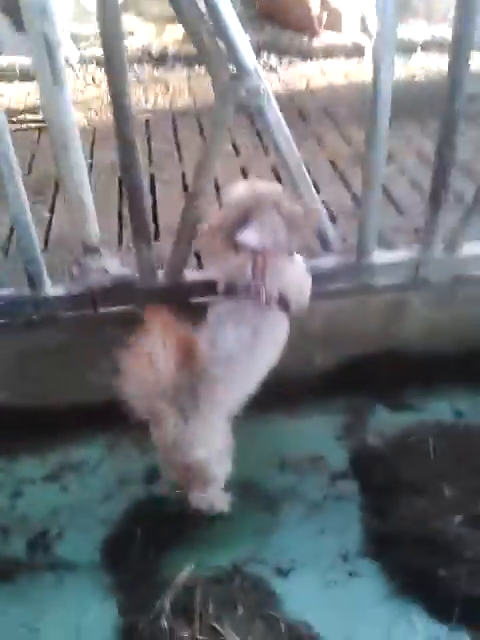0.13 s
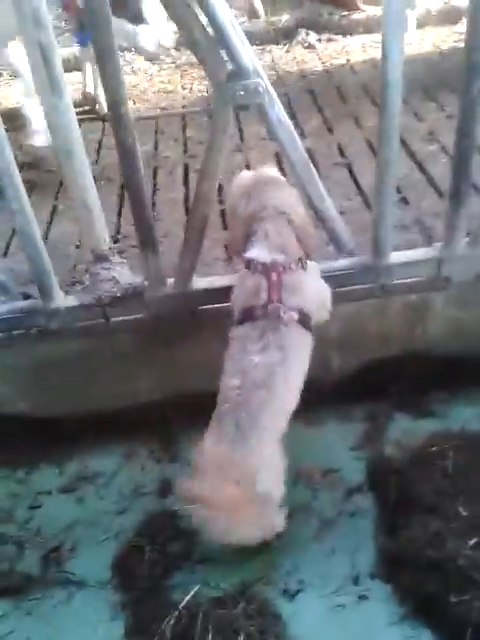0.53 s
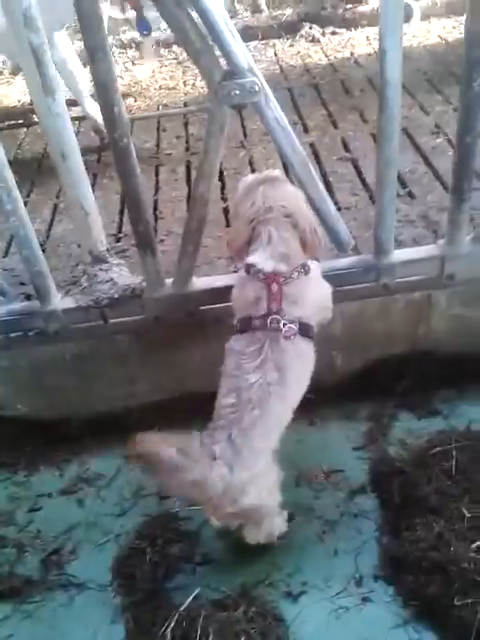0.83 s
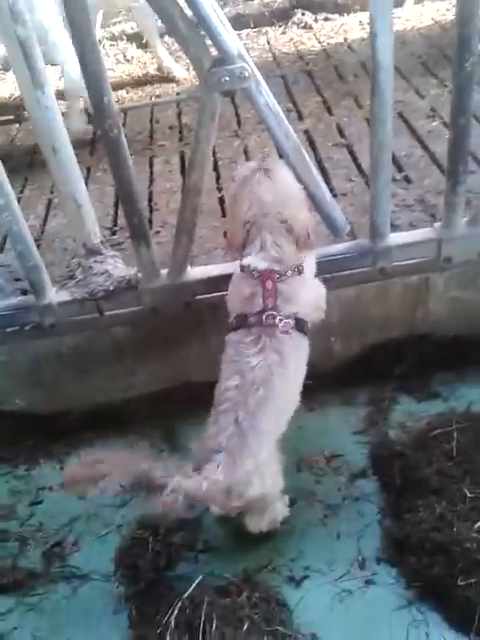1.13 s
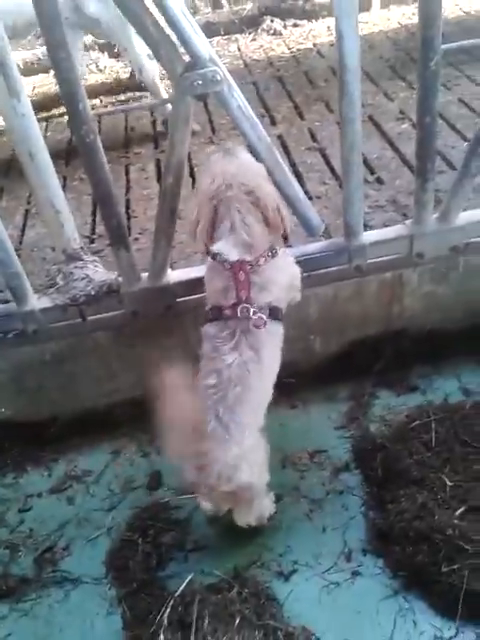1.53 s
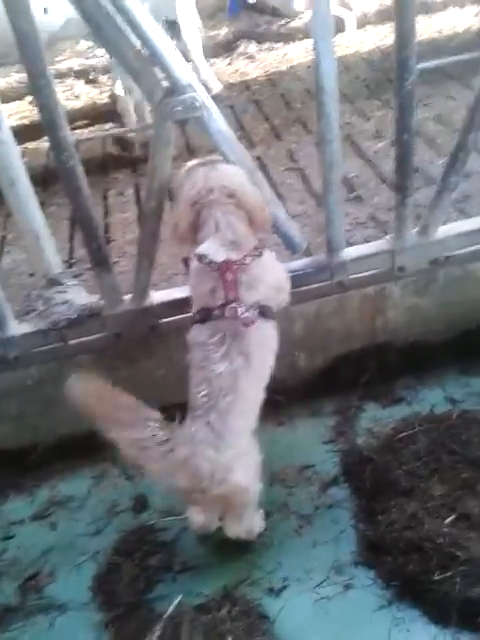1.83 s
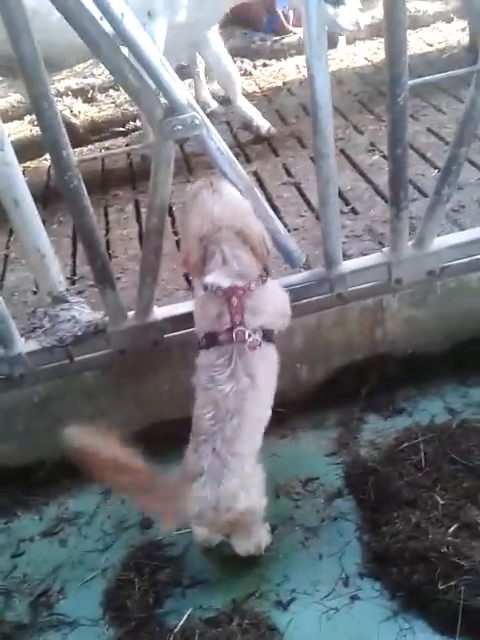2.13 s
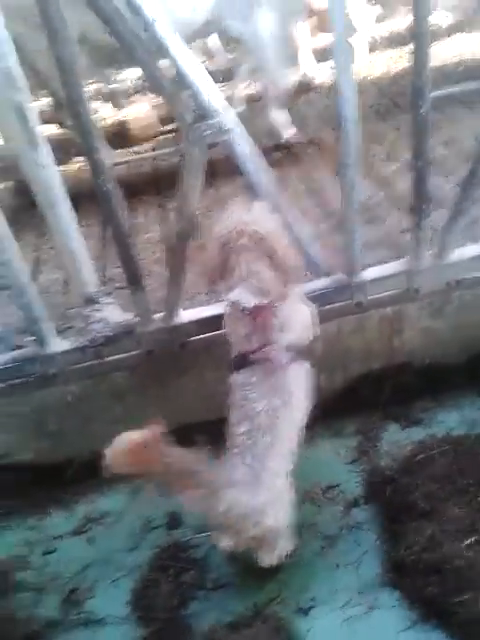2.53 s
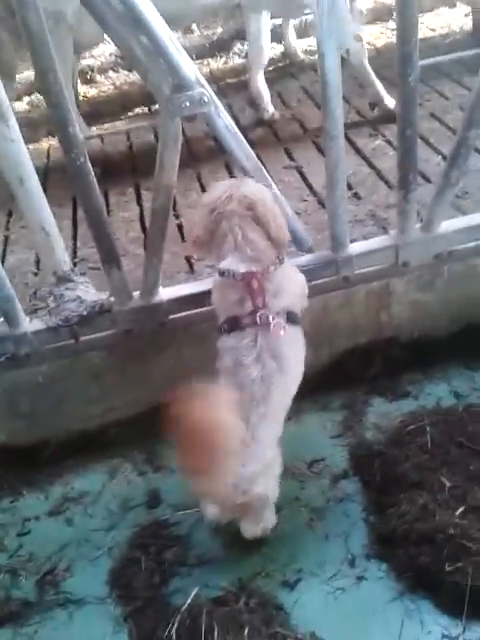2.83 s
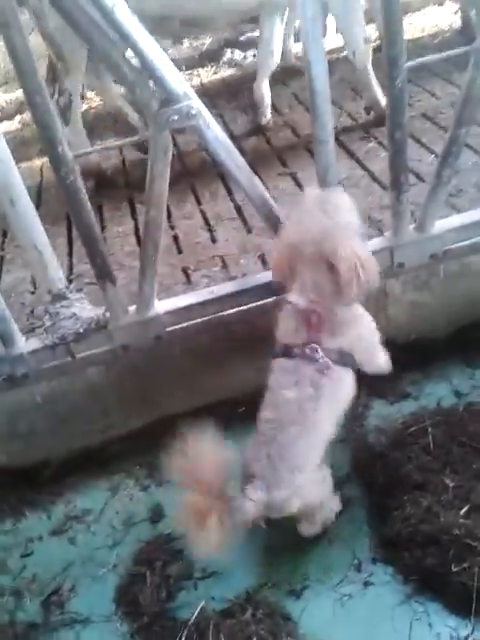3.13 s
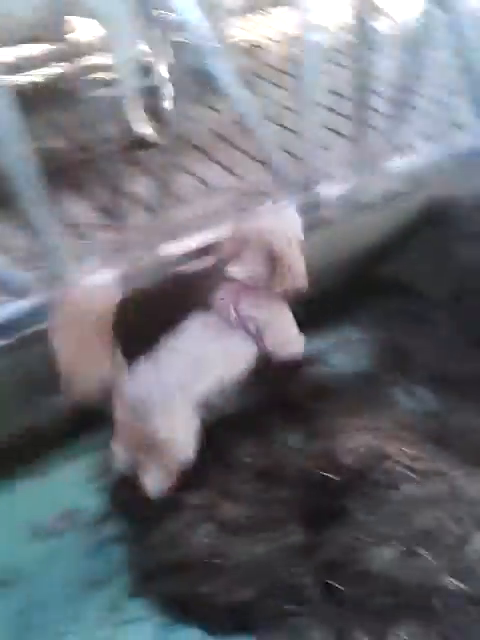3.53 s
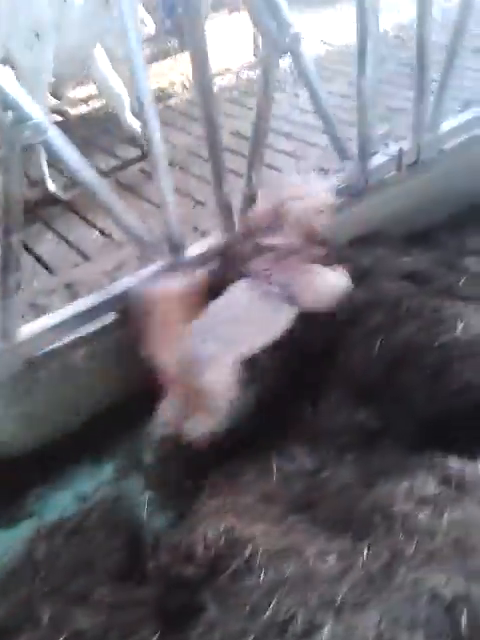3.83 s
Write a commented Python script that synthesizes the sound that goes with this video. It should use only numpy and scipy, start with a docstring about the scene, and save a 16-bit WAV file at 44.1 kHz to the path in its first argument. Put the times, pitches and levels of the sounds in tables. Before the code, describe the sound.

Six short, loud dog barks ring on under a barn roof over steady hush and birds

```python
"""In a large barn a small dog barks six times, facing away; each bark rings on under the roof.
Sparrows chirp in the rafters, a few near and many far, as wobbling whistled arcs. Small ticks on steel rails,
a shaken collar tag and a far gate are touches that set metal modes ringing. The barn hush is banded noise.
Each bark is a gliding near-pure voice with pulsed breath noise; the loud barks overload the microphone."""
import sys
import numpy as np
from scipy import signal
from scipy.io import wavfile
from scipy.ndimage import uniform_filter1d

SR = 44100
rng = np.random.default_rng(int(sys.argv[2]) if len(sys.argv) > 2 else 0)


def output_pcm(signal):
    """Save a mono or channel-first signal as 16-bit PCM at the path in sys.argv[1].

    Samples are clipped to [-1, 1] before scaling.
    """
    pcm = np.clip(np.atleast_2d(signal).T, -1, 1) * 32767
    wavfile.write(sys.argv[1], SR, np.round(pcm).astype(np.int16))


N = 176400  # four seconds


def amp(db):
    """Amplitude factor of a level in dB."""
    return 10 ** (np.asarray(db) / 20)


def rms_one(x):
    """Scale a signal to an RMS of 1."""
    return x / np.sqrt(np.mean(x ** 2) + 1e-20)


def at_hz(points, hz):
    """Read a curve of (Hz, value) points, straight over log frequency."""
    points = np.array(points)
    return np.interp(np.log(hz), np.log(points[:, 0]), points[:, 1])


def drift(rate_hz, size):
    """Random wander of spread 1: noise through a double one-pole low-pass."""
    warm_up = 8000
    r = np.exp(-2 * np.pi * rate_hz / SR)
    noise = rng.standard_normal(size + warm_up)
    return rms_one(signal.lfilter([1], [1, -2 * r, r * r], noise)[warm_up:])


def resonance(x, hz, width_hz):
    """Two-pole resonance with a peak gain of about 1."""
    r = np.exp(-np.pi * width_hz / SR)
    feedback = [1, -2 * r * np.cos(2 * np.pi * hz / SR), r * r]
    return signal.lfilter(np.array([1, 0, -1]) * (1 - r * r) / 2, feedback, x)


def high_pass(x, order, hz):
    """Butterworth high-pass."""
    return signal.sosfilt(signal.butter(order, hz, "high", fs=SR, output="sos"), x)


def add(out, s, sound):
    """Mix a sound in at s seconds, cut at the end of the track."""
    i = max(int(s * SR), 0)
    out[i:i + len(sound)] += sound[:len(out) - i]


def arc(u, first_hz, turn_hz, last_hz, turn_share, bend):
    """Pitch bends from the first to the turning pitch, then to the last; u runs 0 to 1."""
    turn = np.clip(turn_share, .05, .95)
    before = u < turn
    span_hz = np.where(before, turn_hz - first_hz, turn_hz - last_hz)
    distance = np.abs((u - turn) / np.where(before, turn, 1 - turn))
    return turn_hz - span_hz * distance ** bend


def bands(size):
    """Third-octave bands of noise with their centres; neighbours come from separate noises."""
    edges = 70 * 2 ** np.arange(0, 8.1, 1 / 3)
    white = rng.standard_normal((2, size))
    for k, (low, high) in enumerate(zip(edges, edges[1:])):
        band_pass = signal.butter(2, [low, high], "band", fs=SR, output="sos")
        yield np.sqrt(low * high), signal.sosfilt(band_pass, white[k % 2])


def ring(touches, modes):
    """Touches set a body's modes ringing, each a dying sine."""
    out = np.zeros(N)
    for hz, db, t60 in modes:
        r, w = amp(-60 / (t60 * SR)), 2 * np.pi * hz / SR
        # the tiny offset keeps the filter clear of denormal numbers
        out += signal.lfilter([amp(db) * np.sin(w)], [1, -2 * r * np.cos(w), r * r], touches + 1e-18)
    return out


def hush():
    """Steady noise of the barn, its bands wavering a little in level."""
    # Each row: frequency in Hz, relative noise level per Hz in dB.
    hush_curve = [(100, -21), (200, 1), (400, -12.5), (700, -12), (1100, -13.5), (2000, -13), (4300, 2),
                  (6500, -9), (9000, -20.5), (15500, -131)]
    hush_db, waver_db = -28, .8
    wavers = [drift(7.3, N) for _ in range(4)]
    noise = np.zeros(N)
    for k, (hz, band) in enumerate(bands(N)):
        noise += band * amp(at_hz(hush_curve, hz) + waver_db * wavers[k % 4])
    return amp(hush_db) * rms_one(noise)


def chirp(length, db, first_hz, turn_hz, last_hz, turn_share):
    """A hoarse whistled arc: wobbling pitch, a fast warble and random wander in its level."""
    bend, wobble_share, rough_share = 1.5, .017, .35
    warble_hz, warble_depth = 150, .7
    size = int(length * SR)
    u = np.linspace(0, 1, size)
    wobble = 1 + wobble_share * drift(360, 4000)[:size]
    pitch_hz = arc(u, first_hz, turn_hz, last_hz, turn_share, bend) * wobble
    phase = 2 * np.pi * np.cumsum(pitch_hz) / SR
    warble = 1 + warble_depth * np.sin(2 * np.pi * (warble_hz * u * length + rng.random()))
    warble += rough_share * drift(470, 4000)[:size]
    return amp(db) * np.sin(np.pi * u) ** .5 * warble * np.sin(phase)


def sparrows():
    """The near birds, and a chorus of far ones that reach the microphone through the barn only."""
    # Near chirps. Each row: start in seconds, length in seconds, level in dB, first, turning and
    # last pitch in Hz, turning point as a share of the length.
    near_chirps = [(0.000, 0.014, -23, 4700, 4700, 3030, 0.15),
                   (0.335, 0.044, -15.5, 3896, 5090, 3710, 0.35),
                   (0.728, 0.016, -24.5, 4440, 4870, 4600, 0.63),
                   (0.757, 0.034, -25.5, 3850, 4850, 4400, 0.9),
                   (0.795, 0.025, -21.5, 3250, 3306, 2780, 0.4),
                   (1.036, 0.038, -23, 5070, 5200, 4700, 0.37), (1.167, 0.038, -18, 4470, 4970, 4020, 0.22),
                   (1.195, 0.061, -21, 3856, 3940, 3960, 0.7), (1.55, 0.016, -26, 5090, 5500, 5440, 0.73),
                   (1.568, 0.017, -16.5, 3644, 4200, 4100, 0.92),
                   (1.581, 0.021, -17, 4116, 5100, 2800, 0.24), (1.61, 0.04, -26.5, 2600, 2974, 2750, 0.38),
                   (1.926, 0.056, -22, 5500, 5590, 2734, 0.063),
                   (1.982, 0.039, -25, 6800, 6894, 4780, 0.044),
                   (2.577, 0.059, -13, 4190, 5060, 3194, 0.098),
                   (3.507, 0.052, -21, 3450, 3574, 2875, 0.28), (3.933, 0.042, -7, 3960, 4920, 3510, 0.28)]
    far_db, far_spread_db, far_turn_hz, far_turn_spread_hz = -35, 4.5, 4700, 200
    near = np.zeros(N)
    for s, *row in near_chirps:
        add(near, s, chirp(*row))
    far = np.zeros(N + SR)  # begins one second early, so the barn already rings at the start
    for when, loud, pitch in rng.random((60, 3)):
        turn_hz = far_turn_hz + far_turn_spread_hz * (2 * pitch - 1)
        db = far_db + far_spread_db * (2 * loud - 1)
        # these arcs rise all the way
        sound = chirp(0.084, db, 0.91 * turn_hz, turn_hz, 1.3 * turn_hz, turn_share=.33)
        add(far, when * (N + SR) / SR, sound)
    return near, far


def barn():
    """Two-second echo: strong early reflections, then noise that dies band by band; unit energy."""
    # Each row: frequency in Hz, time to die by 60 dB in seconds.
    barn_t60 = [(150, 5.8), (400, 1.91), (630, 1.755), (800, 1.88), (1100, 1.85), (1400, 1.87),
                (2000, 1.435), (4500, 0.76), (10000, 0.27)]
    onset_s, early_db, early_t60_s = 0.01, 2, 0.084
    t = np.arange(2 * SR) / SR
    echo = sum(band * amp(-60 * t / at_hz(barn_t60, hz)) for hz, band in bands(len(t)))
    early = amp(early_db - 60 * t / early_t60_s)
    echo = echo * np.minimum(t / onset_s, 1) * (1 + early)
    return echo / np.sqrt(np.sum(echo ** 2))


def formant(breath, hz, width_hz):
    """Breath through one resonance twice, evened to RMS 1."""
    return rms_one(resonance(resonance(breath, hz, width_hz), hz, width_hz))


def dog():
    """A near-pure gliding voice, plus breath noise gated by each cycle through throat and mouth resonances."""
    # Each row: start in seconds, length in seconds, starting level in dB, first, turning and last pitch in Hz,
    # turning point as a share of the length, bend of the arc, attack in seconds, mouth resonance in Hz,
    # upper resonance in Hz, its level in dB, high resonance level in dB, hoarseness in dB.
    bark_rows = [(0.331, 0.23, 1, 561.7, 728.5, 579, 0.59, 1.64, 0.056, 1065, 2094, -5.5, -22, -3),
                 (1.022, 0.14, 1, 602, 701.6, 550.7, 0.39, 1.45, .028, 1100, 1655, -8, -21, -3),
                 (1.261, 0.14, 2, 620, 691, 535, 0.4514, 1.6, 0.027, 982, 1590, -6.5, -54, -3),
                 (2.11, 0.14, 3.5, 451.8, 690.4, 609.3, 0.56, 1.54, 0.039, 1045, 1606, -7, -15, -2),
                 (3.065, 0.14, 1.5, 572.8, 644.7, 496, 0.741, 2.267, 0.037, 1117, 1820, -5, -11, -1.5),
                 (3.335, 0.11, 4, 607.4, 800.3, 586, .42, .7, .016, 1004, 1640, -11, -18, -9.5)]
    # Levels of the second to fifth harmonic of the clear voice at the bark's end, in dB.
    overtone_levels = [-18, -9, -28, -19]
    jitter_share, shimmer_db, grain_db = .024, 1.5, 1.5  # unevenness of pitch, clear voice and breath
    throat_hz, throat_width_hz = 620, 225
    mouth_width_hz, mouth_db = 438, -1
    upper_width_hz, high_hz = 130, 3500  # the thin high resonance has the upper one's width
    rasp_hz, rasp_width_hz, rasp_db = 2346, 2320, -8.5
    clearing_share = .6  # the voice clears as the bark goes on
    sag_db, release_share = 6, .12
    out, size = np.zeros(N), SR // 3
    t = np.arange(size) / SR
    for (s, length, db, first_hz, turn_hz, last_hz, turn_share, bend, attack,
         mouth_hz, upper_hz, upper_db, high_db, hoarse_db) in bark_rows:
        u = np.minimum(t / length, 1)
        jitter = 1 + jitter_share * drift(142.5, size)
        pitch_hz = arc(u, first_hz, turn_hz, last_hz, turn_share, bend) * jitter
        phase = 2 * np.pi * np.cumsum(pitch_hz) / SR
        clear = np.sin(phase)
        for k, level in enumerate(overtone_levels):
            clear += amp(level) * u * np.sin((k + 2) * phase)
        clear *= amp(shimmer_db * drift(135, size))

        cycle_gate = np.maximum(np.sin(phase), 0) ** 2
        breath = cycle_gate * rng.standard_normal(size) * amp(grain_db * drift(76, size))
        throat = formant(breath, throat_hz, throat_width_hz)
        mouth = amp(mouth_db) * formant(breath, mouth_hz, mouth_width_hz)
        hoarse = (1 - clearing_share * u) * amp(hoarse_db) * (throat - mouth)
        upper = amp(upper_db) * u ** 2 * formant(breath, upper_hz, upper_width_hz)
        high = amp(high_db) * u ** 2 * formant(breath, high_hz, upper_width_hz)
        rasp = amp(rasp_db + hoarse_db) * np.sin(np.pi * u) ** 2 * formant(breath, rasp_hz, rasp_width_hz)
        voice = clear + hoarse + upper + high - rasp

        shape = np.minimum(t / attack, 1) ** 2 * np.clip((1 - u) / release_share, 0, 1)
        add(out, s, amp(db - sag_db * u) * shape * voice)
    return out


def facing_away(barks):
    """The dog faces away: its direct sound loses part of what lies above 1 kHz."""
    return barks - .55 * high_pass(barks, 1, 1000)


def ticks():
    """Small hard knocks on the steel rails: a touch one millisecond long and one bounce."""
    # Each row: start in seconds, level of the touch in dB.
    tick_rows = [(0.665, -29), (1.903, -28), (2.954, -45.5)]
    # Modes of the rails. Each row: frequency in Hz, level in dB, time to die by 60 dB in seconds.
    rail_modes = [(3400, 11, 0.008), (4200, 9, 0.008), (5300, 2, 0.005), (7800, -3, 0.005),
                  (13500, -18, 0.002)]
    bounce_s, bounce_db = 0.004, -5
    touches = np.zeros(N)
    for s, db in tick_rows:
        add(touches, s, amp(db) * rng.standard_normal(SR // 1000))
        add(touches, s + bounce_s, amp(db + bounce_db) * rng.standard_normal(SR // 1000))
    return ring(touches, rail_modes)


def gate():
    """A far steel gate clanks: a short scrape of noisy touches rings its modes."""
    # Each row: frequency in Hz, level in dB, time to die by 60 dB in seconds.
    steel_modes = [(1500, -1, .01), (1720, 0, .02), (2200, -1, .008), (2700, 0, .02)]
    clank_s, length_s, clank_db = 1.99, 0.044, -45.5
    size = SR // 10
    scrape = rng.standard_normal(size) * (np.arange(size) < length_s * SR)
    touches = np.zeros(N)
    add(touches, clank_s, amp(clank_db) * scrape)
    return ring(touches, steel_modes)


def collar_tag():
    """Each shake is one touch and a dying, uneven rattle into the tag's modes."""
    # Each row: start of the shake in seconds, level of its touches in dB.
    shake_rows = [(3.655, -35.5), (3.812, -42.5), (3.939, -45.5)]
    # Each row: frequency in Hz, level in dB, time to die by 60 dB in seconds.
    tag_modes = [(9100, -2, .02), (9600, 0, .02), (10000, -3, .03), (10900, -6, .025), (13800, -8, .01),
                 (15200, -5, .015)]
    rattle_per_s, rattle_t60_s = 1100, 0.63
    shakes, t = np.zeros(N), np.arange(SR // 2) / SR
    for s, db in shake_rows:
        rattle = (rng.random(len(t)) < rattle_per_s / SR) * rng.standard_normal(len(t))
        touches = rattle + 2 * (t == 0)
        add(shakes, s, amp(db - 60 * t / rattle_t60_s) * touches)
    return ring(shakes, tag_modes)


def scene():
    """Direct sound of dog, near birds and small metal, the barn's echo of everything, and the hush."""
    dog_room_db, bird_room_db, small_room_db = -8, 0, -16  # sent into the echo
    barks = dog()
    near, far = sparrows()
    small = ticks() + collar_tag()
    sent = far.copy()
    sent[SR:] += amp(dog_room_db) * barks + amp(bird_room_db) * near + amp(small_room_db) * small + gate()
    wet = signal.fftconvolve(sent, barn())[SR:N + SR]
    return (facing_away(barks) + near + small + wet + hush())[None]


def record(dry):
    """Bass is cut, a slow gain control ducks loud passages, peaks overload and meet a ceiling, the top is cut."""
    duck_above_db, duck_share, duck_attack_s = -23, 0.24, .05
    excess_release_db_per_s = 8  # fall of the held excess, before the share is taken
    overload, knee, ceiling = .66, 60, .72
    x = high_pass(dry, 4, 315)
    level_db = 10 * np.log10(uniform_filter1d(x ** 2, size=441) + 1e-9)  # over 10 ms
    # hold each peak of the excess, falling at a steady rate
    ramp = excess_release_db_per_s * np.arange(N) / SR
    over_db = np.maximum.accumulate(np.maximum(level_db - duck_above_db, 0) + ramp, axis=-1) - ramp
    r = np.exp(-1 / (duck_attack_s * SR))
    x = x * amp(-duck_share * signal.lfilter([1 - r], [1, -r], over_db))
    x = x / (1 + np.abs(x / overload) ** knee) ** (1 / knee)
    x = high_pass(x, 1, 150).clip(-ceiling, ceiling)  # coupling after the overload tilts the flat tops
    return signal.sosfilt(signal.cheby2(12, 70, 16100, fs=SR, output="sos"), x)


dry = scene()
out = record(dry)
output_pcm(out)
```